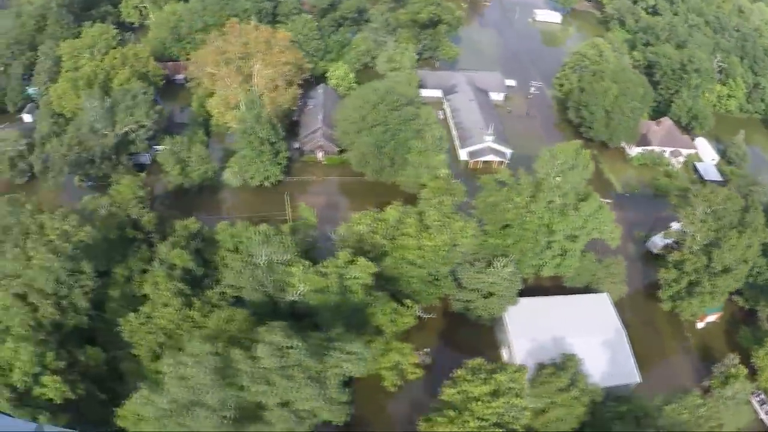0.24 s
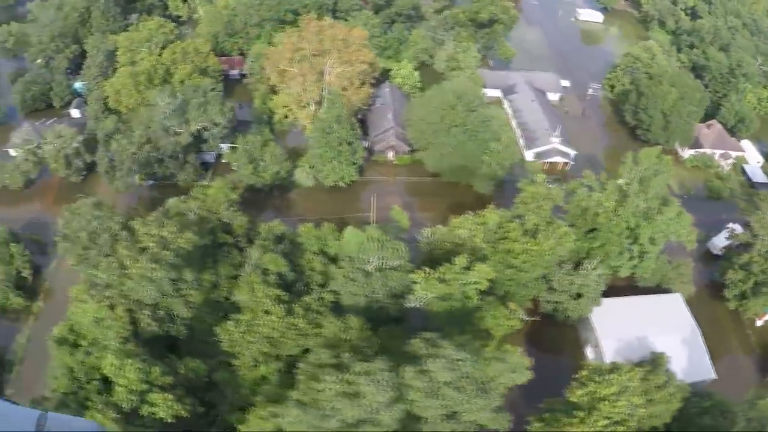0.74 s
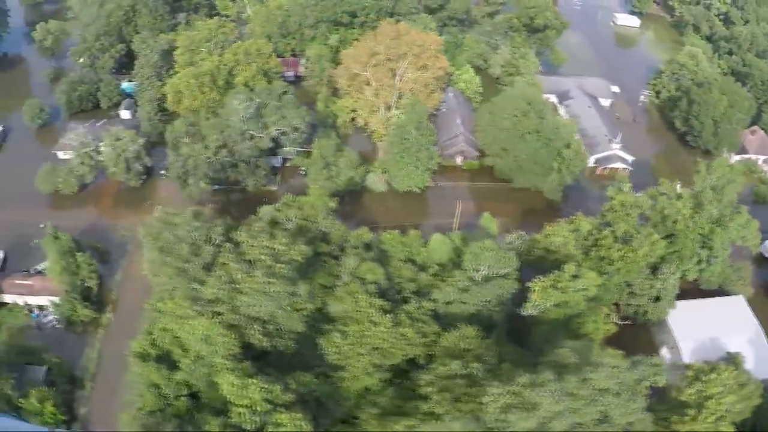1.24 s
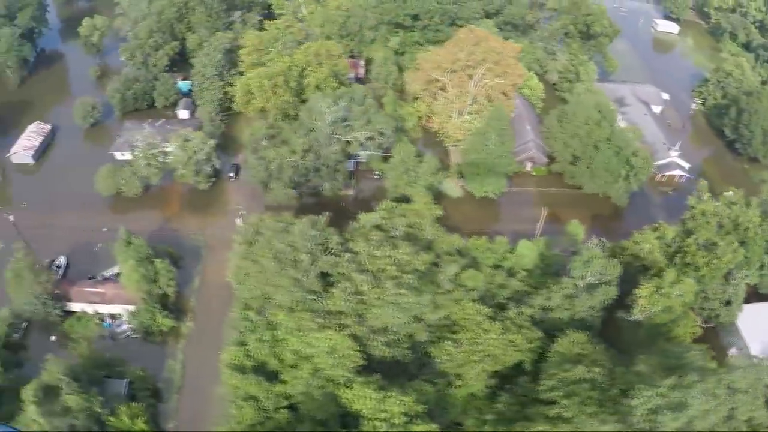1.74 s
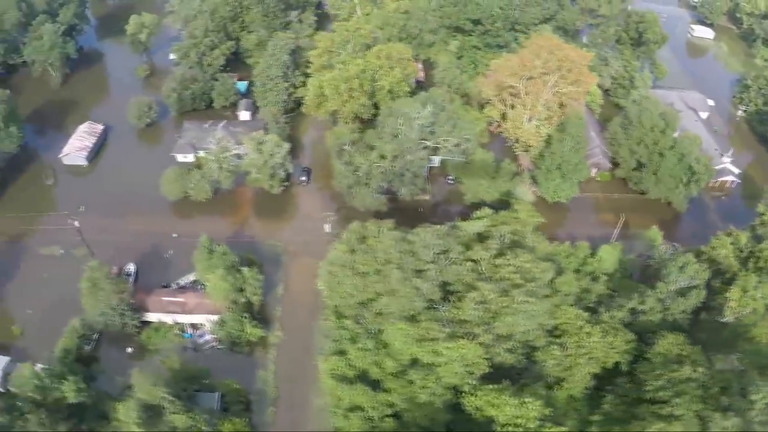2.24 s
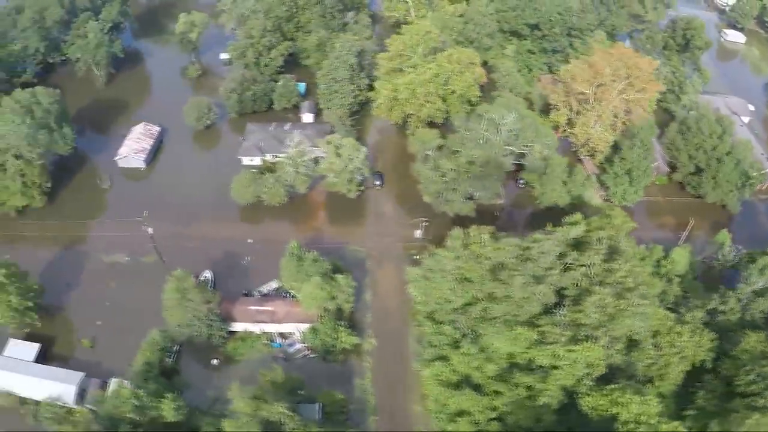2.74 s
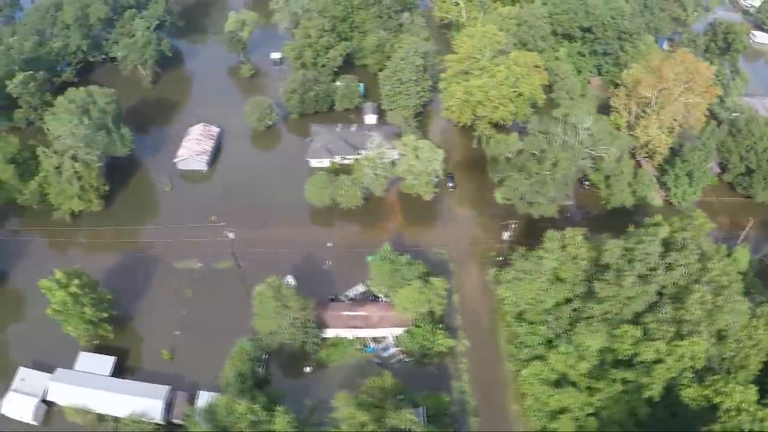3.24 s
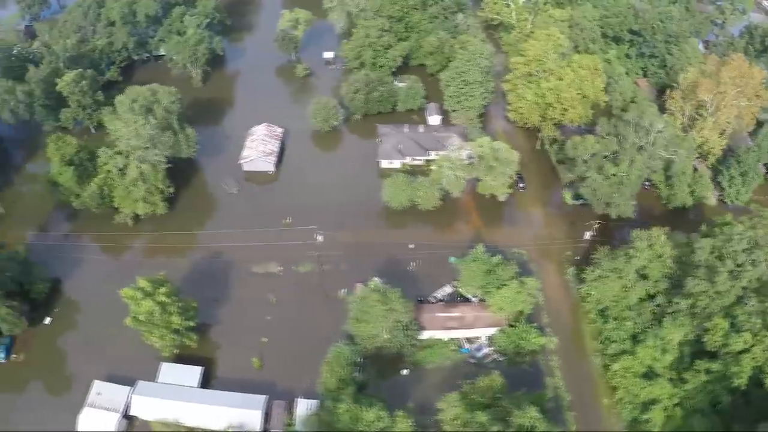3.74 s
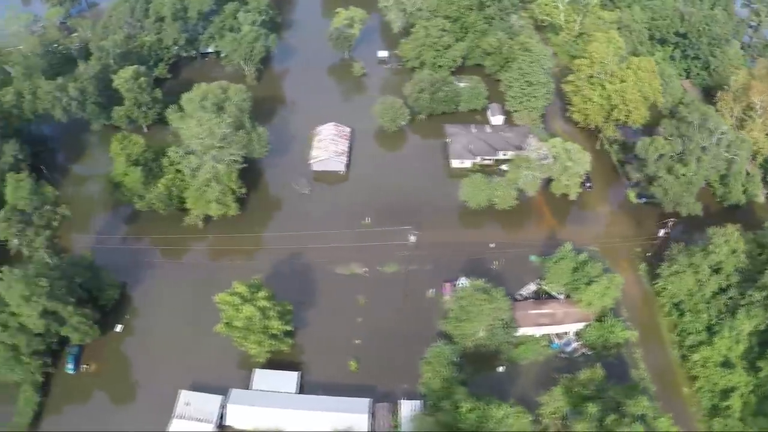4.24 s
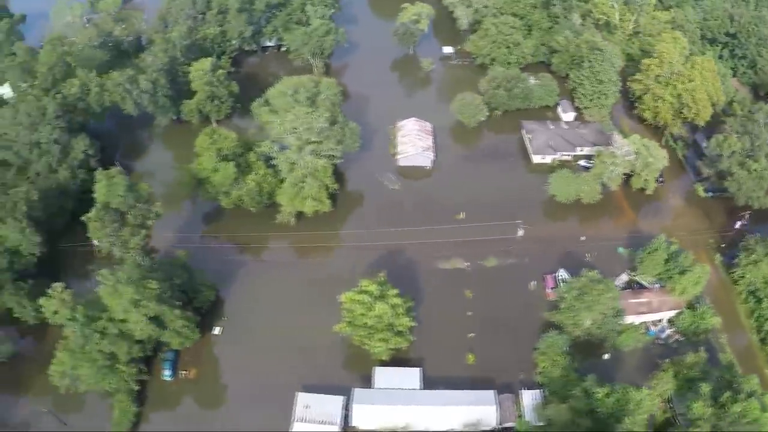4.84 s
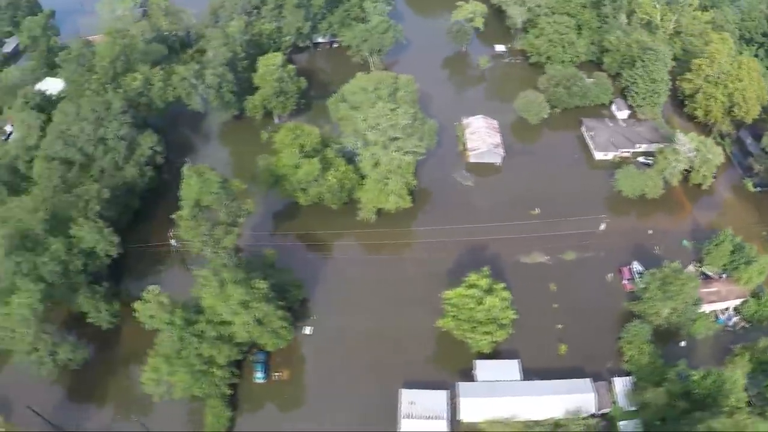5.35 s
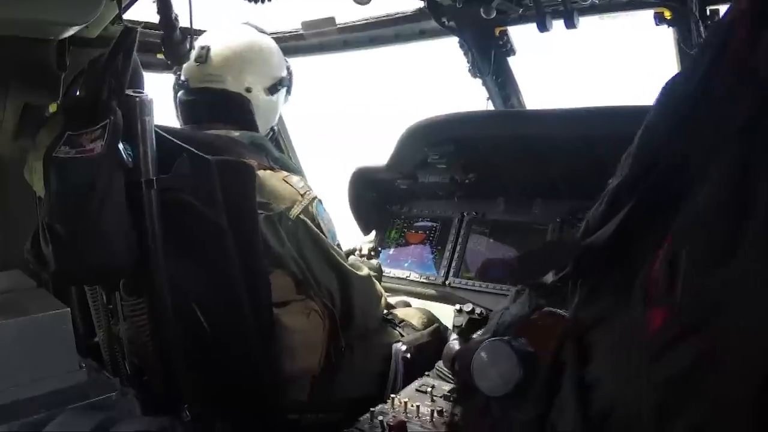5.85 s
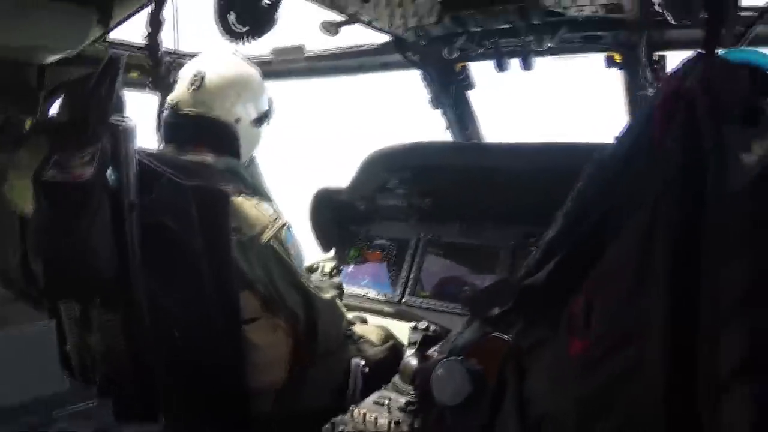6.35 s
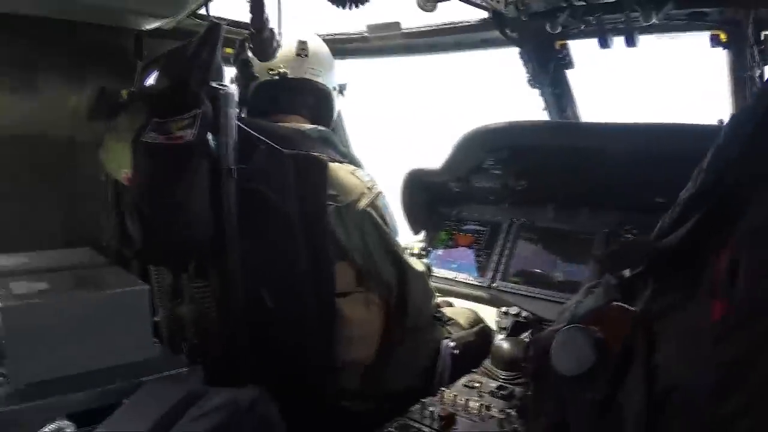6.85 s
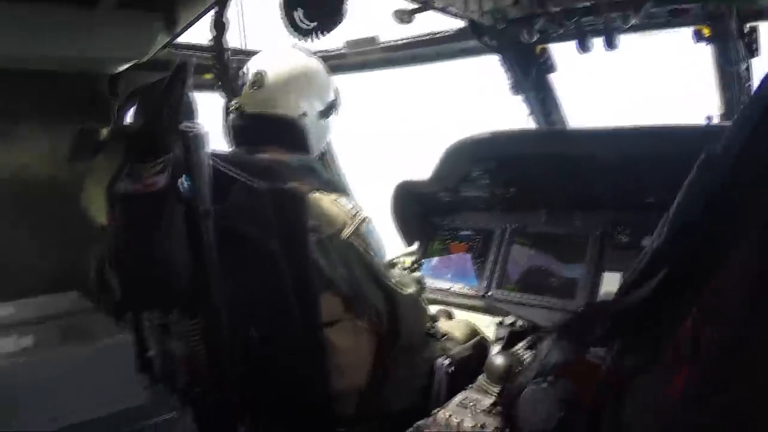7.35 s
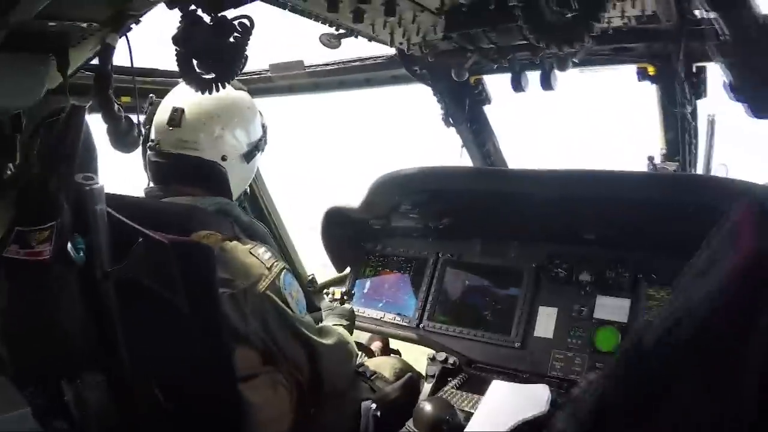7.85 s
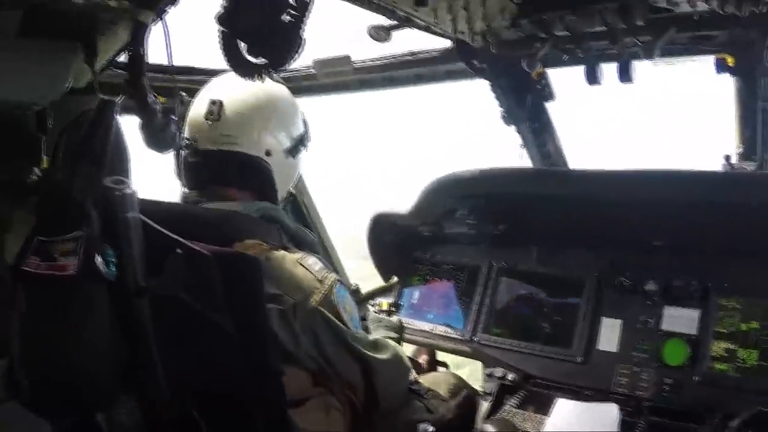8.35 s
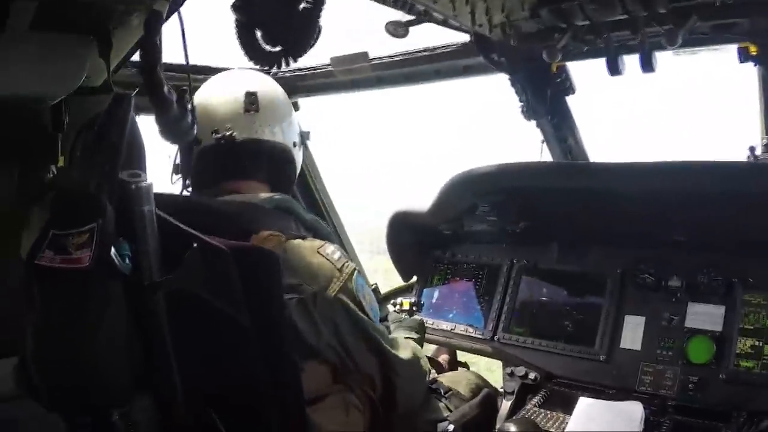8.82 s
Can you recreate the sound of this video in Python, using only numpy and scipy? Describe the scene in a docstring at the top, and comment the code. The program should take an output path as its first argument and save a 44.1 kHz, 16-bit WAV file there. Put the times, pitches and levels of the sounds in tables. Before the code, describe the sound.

Helicopter in flight at an open door, fluttering blades and rushing wind, then an abrupt cut to a deep throbbing, whining cockpit with a few knocks.

```python
"""In a four-bladed helicopter in cruise: first at the open side door, then, after a blink of silence, behind the pilots.
Each main blade sends out a pressure wave (a sum of harmonics) and a swish (shaped noise that swells per blade).
At the door the tail rotor hums, the slipstream buffets, and each blade whistles with its own strength.
In the cockpit the wind is shut out: a deep throb, gearbox whine and two thin turbine whistles remain,
with an opening surge of noise, a short faint crackle and three knocks of loose kit."""
import sys
import numpy as np
from scipy import signal
from scipy.fft import irfft, next_fast_len
from scipy.io import wavfile
from scipy.ndimage import uniform_filter1d, minimum_filter1d

SR = 44100
rng = np.random.default_rng(int(sys.argv[2]) if len(sys.argv) > 2 else 0)


def dump(signal):
    """Clip the signal to [-1, 1] and save it as 16-bit WAV at the path in sys.argv[1]."""
    limited = np.clip(np.atleast_2d(signal).T, -1, 1)
    pcm = np.round(limited * 32767).astype(np.int16)
    wavfile.write(sys.argv[1], SR, pcm)


N = 400428
T = np.arange(N) / SR  # time of each sample, s
FREQS = np.fft.rfftfreq(2 * next_fast_len(N // 2 + 1), 1 / SR)
TAIL_RATIO = 4.609  # tail blade passes per main blade pass


def undb(db):
    """Turn decibels into gain."""
    return 10 ** (np.asarray(db) / 20)


def unit(x):
    """Scale to an rms (average strength) of 1."""
    return x / np.sqrt(np.mean(x ** 2))


def noise(gain):
    """Noise of rms 1: a random spectrum weighted by the gain at each frequency."""
    spectrum = gain * rng.standard_normal(2 * len(FREQS)).view(complex)
    return unit(irfft(spectrum)[:N])


def walk(rate):
    """Smooth random motion of spread 1 that changes about rate times a second."""
    return noise(np.exp(-(FREQS / rate) ** 2))


def swell(middle_s, half_s):
    """A smooth rise from 0 to 1 and back."""
    return np.exp(-((T - middle_s) / half_s) ** 2)


def rotor(passes, levels_db, unsteady, lead=0):
    """Blade pressure wave: a firm fundamental, and wavering overtones that line up lead of a cycle early."""
    wave = undb(levels_db[0]) * np.cos(2 * np.pi * passes)
    for k, db in enumerate(levels_db[1:], 2):
        waver = unsteady * walk(1.8)  # radians, from the unsteady airflow
        wave = wave + undb(db) * np.cos(2 * np.pi * k * (passes + lead) + waver)
    return np.sqrt(2) * wave  # makes each level an rms level


def chop(passes, lag, depth_db, scatter_db):
    """Gain that swells once a blade, lag of a cycle after the pass, with random scatter."""
    beat_db = depth_db * np.cos(2 * np.pi * (passes - lag))
    return unit(undb(beat_db + scatter_db * walk(31)))


def air(points, hollows=()):
    """Turbulence: noise of rms 1 with a smooth spectrum, less any hollows."""
    hz, db = np.transpose(points)
    db = np.interp(np.log(FREQS + 1), np.log(hz), db, left=-150, right=-150)
    for centre, width, depth in hollows:
        db = db - depth * np.exp(-((FREQS - centre) / width) ** 2)
    return noise(undb(db))


def whine(hz, width, rough):
    """A tone of rms 1 whose pitch wanders within its width and whose strength flutters with load."""
    phase = 2 * np.pi * np.cumsum(hz + width / 2 * walk(width)) / SR
    flutter = walk(35) * np.sin(phase) + walk(35) * np.cos(phase)
    return unit(np.sin(phase) + rough * flutter)


def gears(table, rough):
    """Meshing gear teeth: the sum of a set of whines."""
    return sum(undb(db) * whine(hz, width, rough) for hz, width, db in table)


# Rotor harmonics 1, 2, 3 .. at the door, of the main and of the tail blade rate: level_db
DOOR_ROTOR = [-16, -30, -24, -24.5, -34, -41]
DOOR_TAIL = [-21, -30, -40]


def door_rotors(passes):
    """The main rotor thuds at its blade rate; the tail rotor hums faster, its timing wandering a little."""
    main = rotor(passes, DOOR_ROTOR, unsteady=0.56, lead=0.083)
    tail = rotor(TAIL_RATIO * passes + 0.055 * walk(2.2), DOOR_TAIL, unsteady=0.24)
    return main + tail


def slipstream(db, drift_db_per_s, lull_db):
    """Gain of a layer at the door: a steady drift, and one drop as the slipstream slackens."""
    return undb(db + drift_db_per_s * T - lull_db * swell(middle_s=5.09, half_s=0.36))


# Whistle strength of each of the four blades in turn: relative_db
BLADE_WHISTLES = [0, -8, -12, -8]


def blade_whistle(passes, hz, fall_hz, width_hz):
    """Each blade whistles with its own strength; the pitch falls as it sweeps past."""
    blade = np.round(passes).astype(int)
    place = passes - blade  # -0.5 to 0.5 of a pass, nearest at 0
    pitch = hz - fall_hz * place + 110 * walk(8)
    size_db = np.array(BLADE_WHISTLES)[blade % len(BLADE_WHISTLES)] + .8 * walk(4)
    breathy_tone = unit(walk(width_hz) * np.sin(2 * np.pi * np.cumsum(pitch) / SR))
    return undb(size_db) * np.cos(np.pi * place) * breathy_tone


# Spectrum shapes of the air noise at the door, low to high: pitch_hz, relative_db
DOOR_BUFFET = [(8, -46), (28, -37), (120, -39.5), (200, -46), (280, -52.5), (450, -58), (1000, -100)]
DOOR_ROAR = [(120, -62), (280, -53), (400, -48), (480, -56.5), (800, -53), (1000, -60), (1400, -74),
             (2500, -100)]
DOOR_RUSH = [(600, -80), (1000, -61), (1300, -61.5), (1600, -59), (2300, -63.5), (2750, -62), (3400, -64.5),
             (4600, -67.5), (6600, -73.5), (9000, -89), (14000, -125)]
DOOR_SWISH = [(3500, -130), (5000, -71.5), (6000, -63), (6700, -61), (7400, -72.5), (8500, -81.5),
              (10000, -94), (12000, -94), (13500, -109), (15000, -130)]
# Hollows in the roar and rush, where reflections cancel: pitch_hz, width_hz, depth_db
DOOR_HOLLOWS = [(565, 33.5, 37), (657, 31, 4), (1110, 98, 13)]


def door_air(passes):
    """Four bands of slipstream turbulence, chopped by the blades, and the blade whistle."""
    buffet = air(DOOR_BUFFET) * slipstream(db=-13.5, drift_db_per_s=-0.38, lull_db=2.5)
    buffet = buffet * chop(passes, lag=0.76, depth_db=0.66, scatter_db=0.25)
    roar = air(DOOR_ROAR, DOOR_HOLLOWS) * slipstream(db=-27.5, drift_db_per_s=0.06, lull_db=3)
    roar = roar * chop(passes, lag=1.0, depth_db=1.5, scatter_db=1.9)
    rush = air(DOOR_RUSH, DOOR_HOLLOWS) * slipstream(db=-28.5, drift_db_per_s=0.64, lull_db=2.5)
    rush = rush * chop(passes, lag=0.1, depth_db=0.9, scatter_db=0.5)
    tips = slipstream(db=-31.0, drift_db_per_s=-0.38, lull_db=4.2)  # shared by swish and whistle
    swish = air(DOOR_SWISH) * tips * chop(passes, lag=0.051, depth_db=1.5, scatter_db=1.13)
    whistle = undb(2.3) * tips * blade_whistle(passes, hz=5850, fall_hz=1400, width_hz=600)
    return buffet + roar + rush + swish + whistle


# Gear mesh tones at the door: pitch_hz, width_hz, level_db
DOOR_GEARS = [(851, 10.5, -54), (1012, 10, -56), (1960, 25.6, -42.5), (2013, 16, -42), (2692, 24.3, -42),
              (2920, 21.5, -47), (3960, 37.7, -49)]


def door_machinery():
    """Faint gear whines and one very faint, high turbine tone."""
    turbine_gain = slipstream(db=-75, drift_db_per_s=1.0, lull_db=14)
    turbine = turbine_gain * whine(hz=13060, width=70, rough=.3)
    return turbine + gears(DOOR_GEARS, rough=0.39)


# Main blade timing at the door: rate_hz, time_of_one_pass_s
DOOR_BLADES = (17.251, .0528)


def door():
    """Both rotors and the slipstream, over faint machinery."""
    rate_hz, pass_s = DOOR_BLADES
    passes = rate_hz * (T - pass_s)  # counts blades; whole numbers are passes
    return door_rotors(passes) + door_air(passes) + door_machinery()


# Rotor harmonics 1, 2, 3 .. in the cockpit, of the main and of the tail blade rate: level_db
COCKPIT_ROTOR = [-8.5, -47, -29, -34.5, -34.5, -36, -35.5, -52, -40, -45, -41, -38, -43, -65]
COCKPIT_TAIL = [-37.5, -38, -63]


def cockpit_rotors(passes):
    """A deep throb from the main rotor's strong fundamental, and a faint tail rotor hum."""
    main = rotor(passes, COCKPIT_ROTOR, unsteady=0.99, lead=.12)
    return main + rotor(TAIL_RATIO * passes, COCKPIT_TAIL, unsteady=0.46)


def cabin(db, surge_db, drift_db_per_s=0, attack_s=0, hold_s=0):
    """Gain of a cockpit layer: an opening surge that falls evenly in dB to a drifting cruise level."""
    age = T - 5.65  # s since the surge's peak
    fall_end_s = 0.48
    rise = np.clip(1 + age / attack_s, 0, 1) if attack_s else 1
    fall = np.clip((fall_end_s - age) / max(fall_end_s - hold_s, .01), 0, 1)
    return undb(db + surge_db * rise * fall + drift_db_per_s * age)


# Main and upper gear mesh, each a cluster of tones: pitch_hz, width_hz, relative_db
MAIN_MESH = [(993, 6.1, -0.5), (975, 3.7, 0.5)]
UPPER_MESH = [(2013, 11.65, 2), (1925, 7.3, -6), (1974, 21.3, -1)]
# Other gear mesh tones in the cockpit: pitch_hz, width_hz, level_db
COCKPIT_GEARS = [(663, 3.7, -48), (1156, 5.8, -49), (1314, 5.1, -46), (2400, 10, -73), (2960, 40, -57),
                 (2990, 24, -59), (3920, 90, -61), (3950, 41, -65), (4870, 40, -63.5), (7660, 30, -67.5)]


def gearbox():
    """Gear teeth whine as they mesh: the main mesh swells once, then the upper one fades briefly."""
    main_gain = cabin(db=-41.0, surge_db=10.5, attack_s=.2, hold_s=.14)
    main_gain = main_gain * undb(6.5 * swell(middle_s=7.5, half_s=0.3))
    upper_gain = cabin(db=-46.5, surge_db=12.5, drift_db_per_s=-0.7)
    upper_gain = upper_gain * undb(-7 * swell(middle_s=7.9, half_s=.2))
    main_mesh = main_gain * gears(MAIN_MESH, rough=0.3)
    upper_mesh = upper_gain * gears(UPPER_MESH, rough=0.51)
    return main_mesh + upper_mesh + gears(COCKPIT_GEARS, rough=.35)


def turbines():
    """Two compressors whistle very high, each in a skirt of hiss; they fade in and speed up a little."""
    first_hz = np.interp(T, [6.55, 7.85], [12910, 13090])
    second_hz = 1.0582 * first_hz
    full_s, rise_db_per_s = 6.92, 52
    fade_db = -55 - rise_db_per_s * np.maximum(full_s - T, 0)
    tones = whine(first_hz, 30, rough=.3) + undb(-4) * whine(second_hz, 45, rough=.3)
    skirts = sum(walk(1100) * np.sin(2 * np.pi * np.cumsum(hz) / SR) for hz in (first_hz, second_hz))
    return undb(fade_db) * (tones + undb(-1) * skirts)


# Knocks in the cabin: start_s, level_db
KNOCKS = [(6.843, -25), (6.904, -20), (7.139, -21)]
# What each knock rings with: pitch_hz, time_to_fall_60_db_s, relative_db
KNOCK_MODES = [(240, .1, -5), (585, .12, 0), (670, .07, -6), (1050, .05, -8), (1420, .04, -7),
               (1830, .03, -11)]


def knocks():
    """Loose kit bumps in the cabin: fading sines make a short hollow ring, slightly retuned each time."""
    age = T[:SR // 8]
    out = np.zeros(N)
    for start_s, db in KNOCKS:
        ring = 0
        for hz, t60, mode_db in KNOCK_MODES:
            tone = np.sin(2 * np.pi * hz * rng.normal(1, .02) * age)
            ring = ring + undb(mode_db - 60 * age / t60) * tone
        start = int(start_s * SR)
        out[start:start + len(age)] += undb(db) * ring * np.minimum(age / .001, 1)  # 1 ms onset
    return out


def crackle(rate):
    """Tiny dry ticks, about rate a second, that start at once, hold and die away."""
    age = T - 5.735
    hold_s, fall_db_per_s = .08, 68
    db = -46.5 - fall_db_per_s * np.maximum(age - hold_s, 0)
    # a tick falls wherever the running count reaches a new whole number
    count = np.cumsum(rate * np.exp(0.31 * walk(220))) / SR
    ticks = np.diff(np.floor(count), prepend=0)
    uneven_ticks = unit(ticks * undb(3 * rng.standard_normal(N)))
    return (age > 0) * undb(db) * uneven_ticks


# Spectrum shapes of the air noise in the cockpit, low to high: pitch_hz, relative_db
COCKPIT_BUFFET = [(8, -55), (60, -52.5), (150, -52), (220, -53), (260, -66), (330, -69.5), (700, -100)]
COCKPIT_ROAR = [(150, -78), (290, -62.5), (340, -70), (430, -56.5), (600, -54), (850, -62), (1200, -66.5),
                (2000, -99)]
COCKPIT_RUSH = [(500, -85), (1000, -71.5), (1200, -70.5), (1450, -67), (1750, -74), (2100, -76.5),
                (3200, -83.5), (6500, -90), (9000, -110), (12000, -125)]
COCKPIT_SWISH = [(2000, -100), (4200, -93), (5600, -87.5), (6700, -82), (7800, -93.5), (8600, -94),
                 (10500, -114), (14000, -125)]


def cockpit_air(passes):
    """Four bands of muffled air noise that pulse with the blades, with an opening surge."""
    buffet = air(COCKPIT_BUFFET) * cabin(db=-24, surge_db=4.5, drift_db_per_s=-1.55, hold_s=0.21)
    buffet = buffet * chop(passes, lag=.88, depth_db=0.8, scatter_db=-1.0)
    roar_gain = cabin(db=-30.5, surge_db=12.5, drift_db_per_s=-0.66, attack_s=0.086, hold_s=.04)
    roar = air(COCKPIT_ROAR) * roar_gain * chop(passes, lag=0.062, depth_db=1.2, scatter_db=1.26)
    rush = air(COCKPIT_RUSH) * cabin(db=-39.0, surge_db=13.0, drift_db_per_s=0.02)
    rush = rush * chop(passes, lag=0.31, depth_db=2.0, scatter_db=1.0)
    swish = air(COCKPIT_SWISH) * cabin(db=-49.0, surge_db=5.0, drift_db_per_s=-0.24)
    swish = swish * chop(passes, lag=0.28, depth_db=4.0, scatter_db=1.5)
    return buffet + roar + rush + swish


# Main blade timing in the cockpit: rate_hz, time_of_one_pass_s
COCKPIT_BLADES = (17.132, 5.7467)


def cockpit():
    """A deep throb, gearbox and turbine whine, knocks and crackle over muffled air noise."""
    rate_hz, pass_s = COCKPIT_BLADES
    passes = rate_hz * (T - pass_s)
    machinery = gearbox() + turbines()
    return cockpit_rotors(passes) + machinery + knocks() + crackle(rate=220) + cockpit_air(passes)


def scene():
    """The door and then the cockpit, parted by a moment of silence."""
    door_end_s, cockpit_start_s = 5.527, 5.559
    fade_s = .001
    before = np.clip((door_end_s - T) / fade_s, 0, 1)
    after = np.clip((T - cockpit_start_s) / fade_s, 0, 1)
    return (door() * before + cockpit() * after)[None]


def record(dry):
    """A limiter turns down peaks near full scale, then a steep low-pass cuts the top."""
    room = .96 / np.maximum(abs(dry), .96)  # gain that would keep each sample within 0.96
    gain = uniform_filter1d(minimum_filter1d(room, size=441), size=441)  # smoothed over 10 ms
    low_pass = signal.ellip(8, .2, 70, 15100, fs=SR, output="sos")
    return signal.sosfilt(low_pass, dry * gain)


dry = scene()
out = record(dry)
dump(out)
```